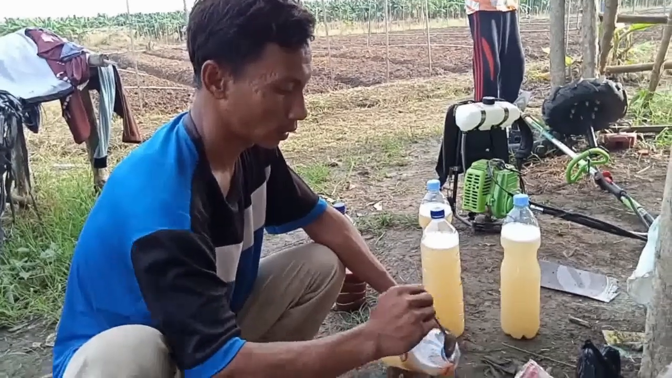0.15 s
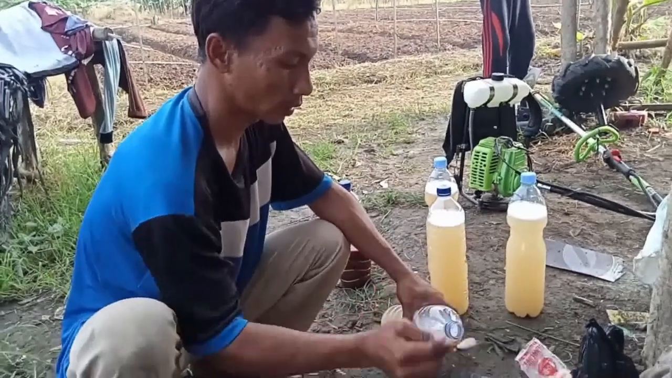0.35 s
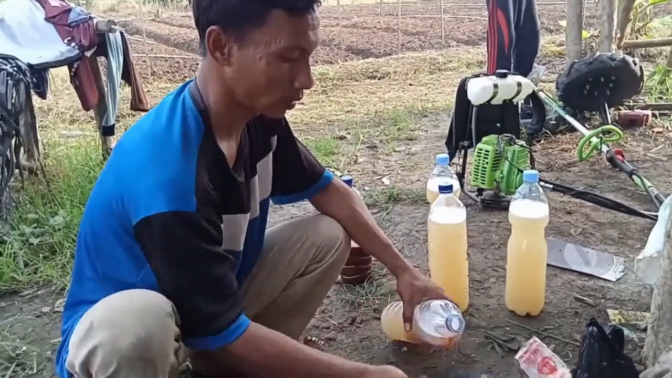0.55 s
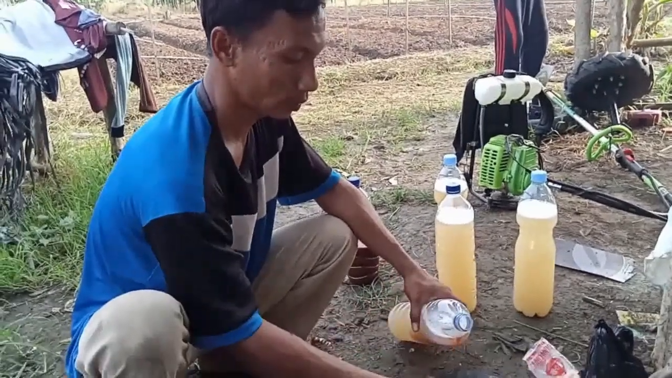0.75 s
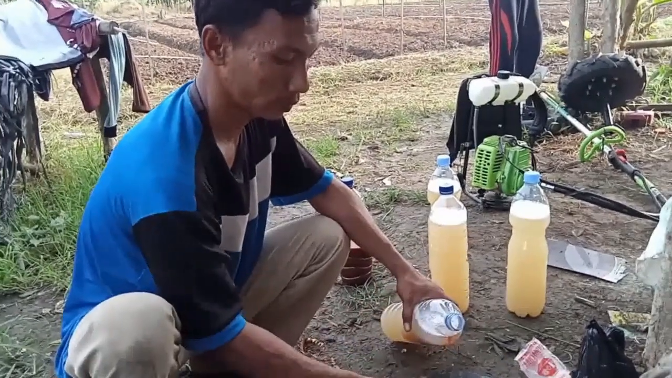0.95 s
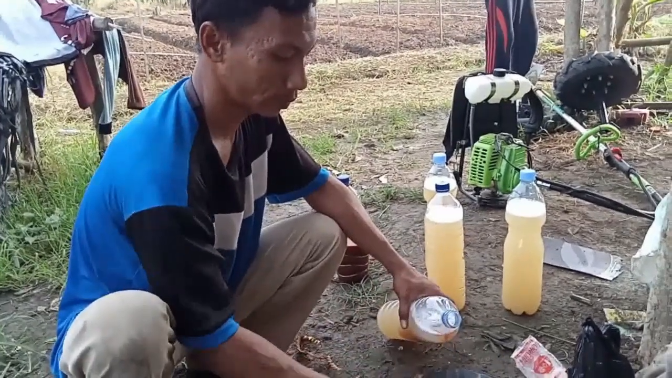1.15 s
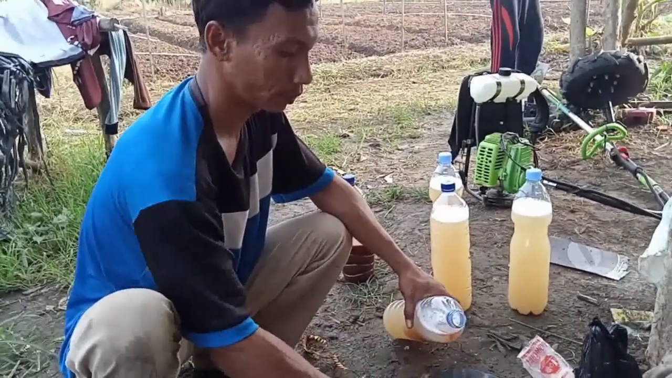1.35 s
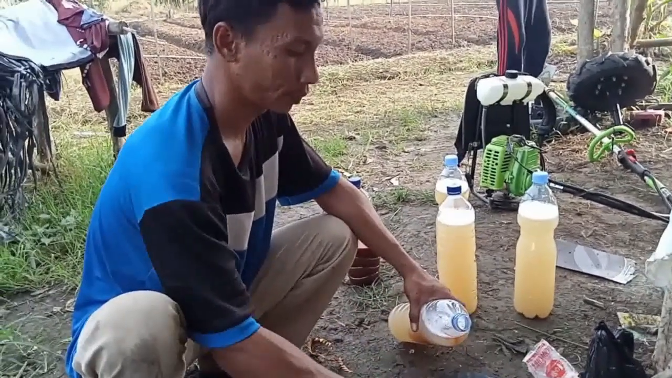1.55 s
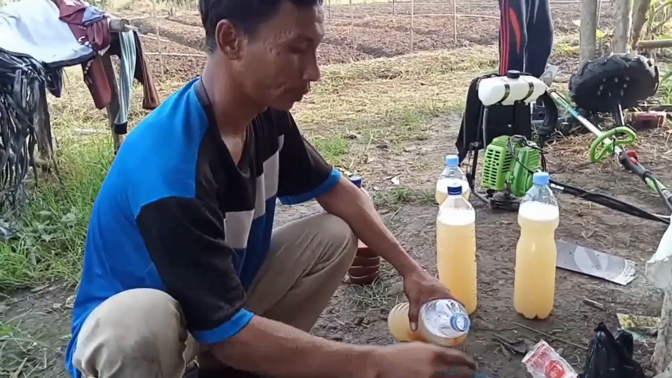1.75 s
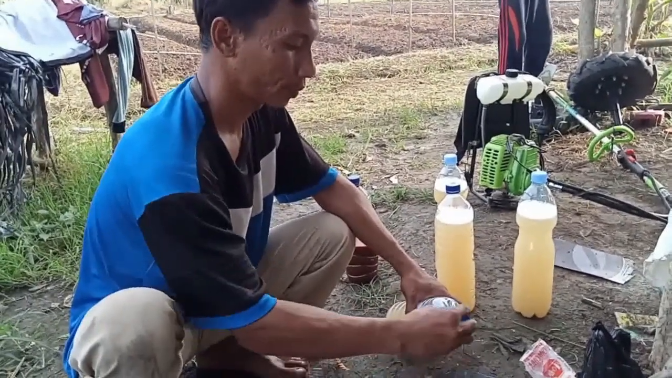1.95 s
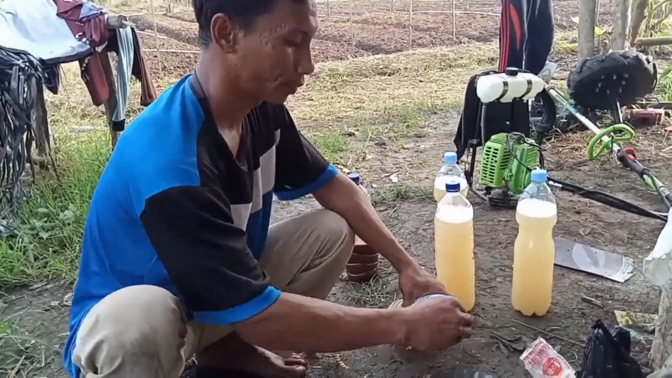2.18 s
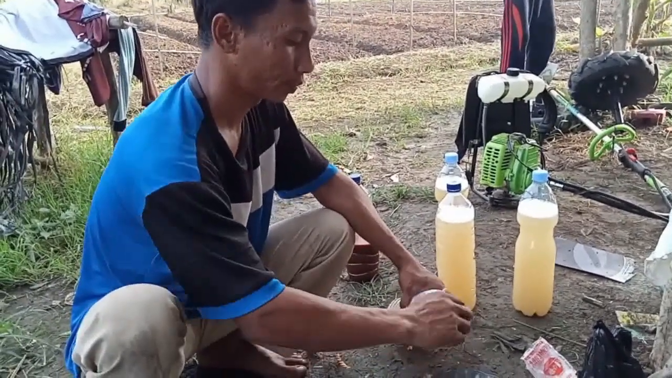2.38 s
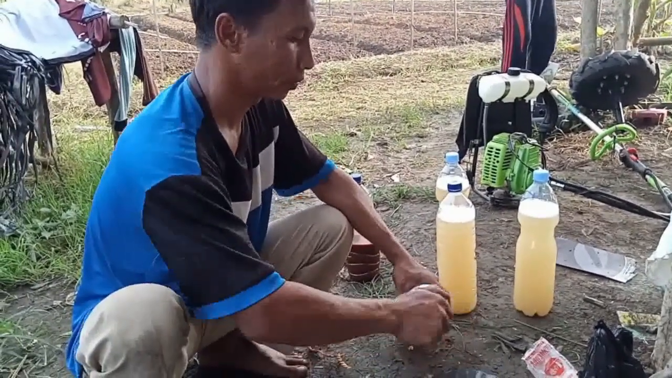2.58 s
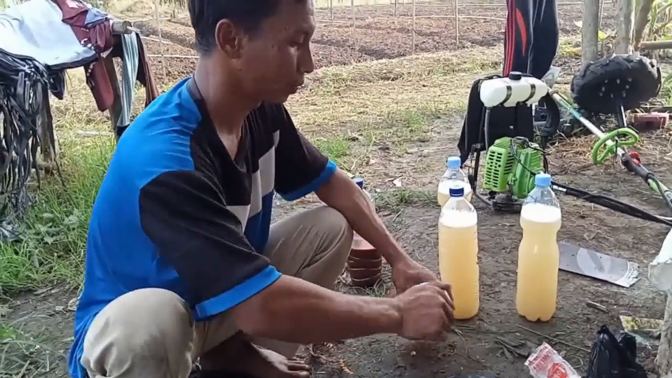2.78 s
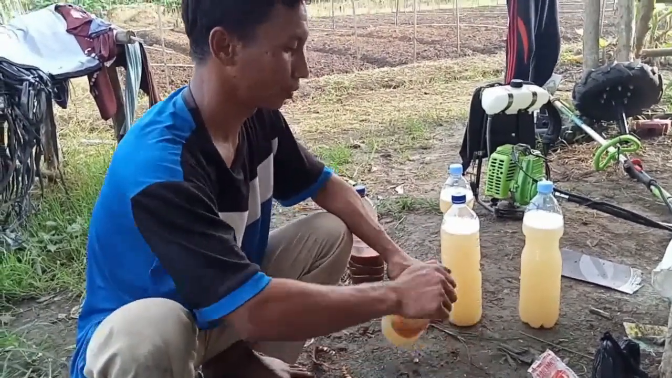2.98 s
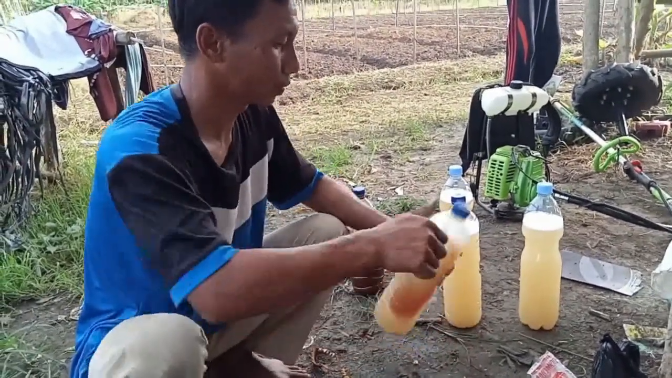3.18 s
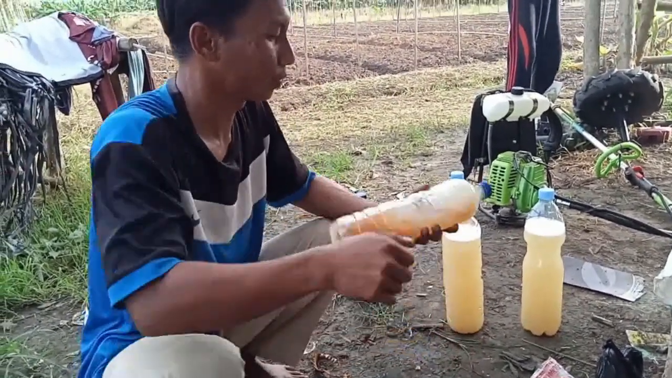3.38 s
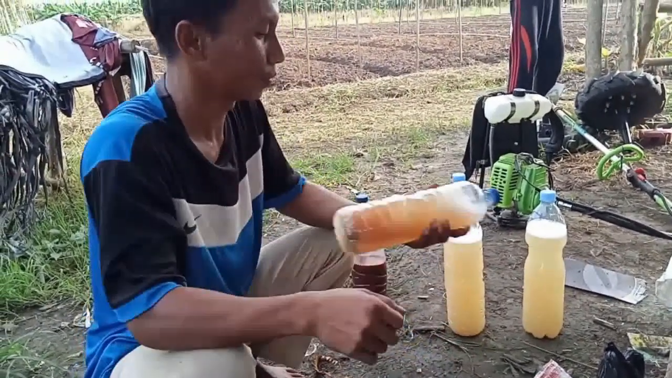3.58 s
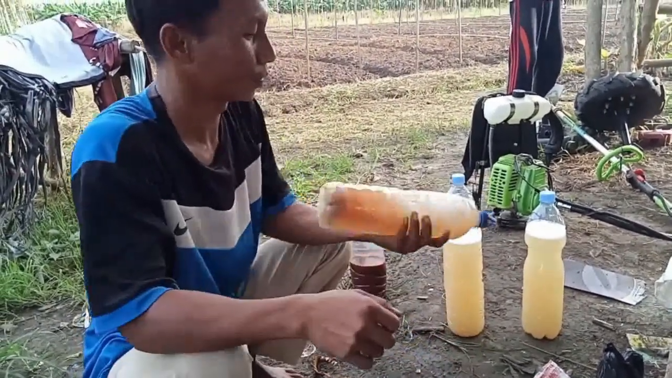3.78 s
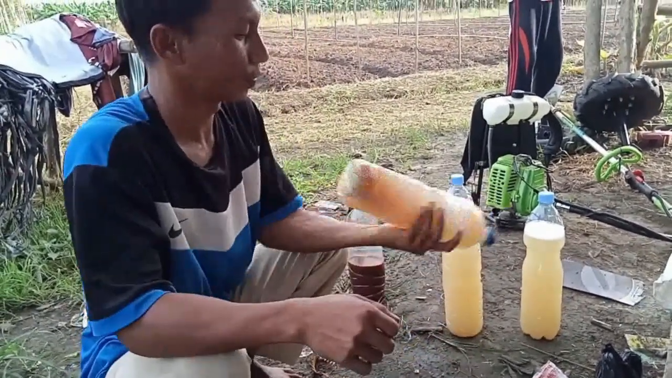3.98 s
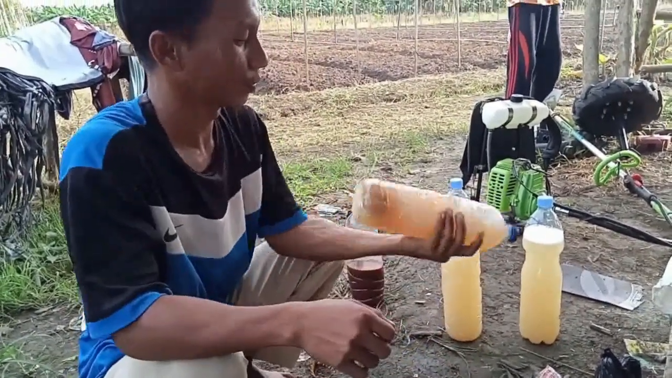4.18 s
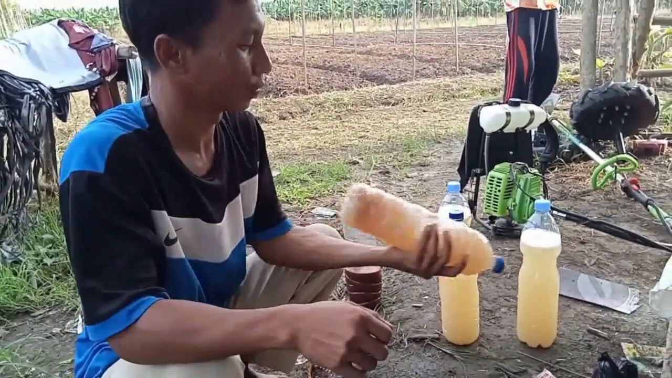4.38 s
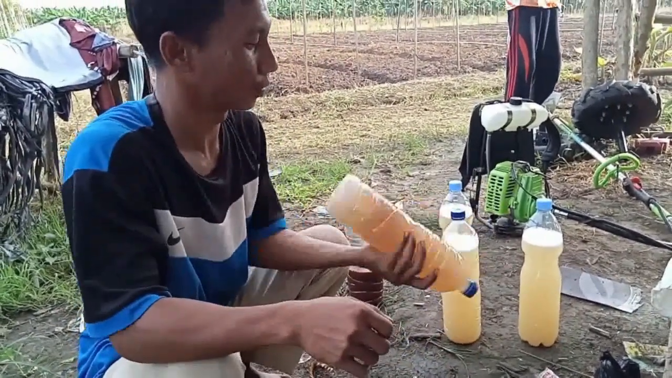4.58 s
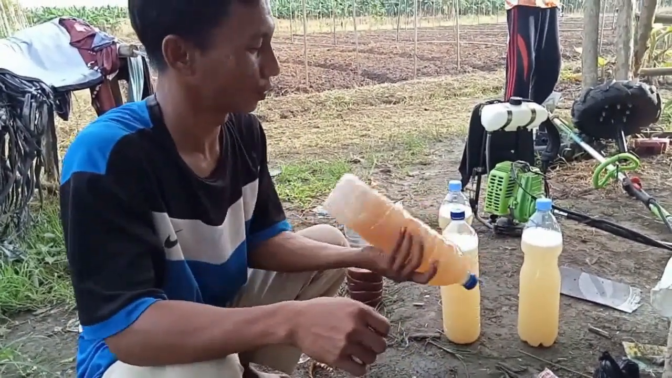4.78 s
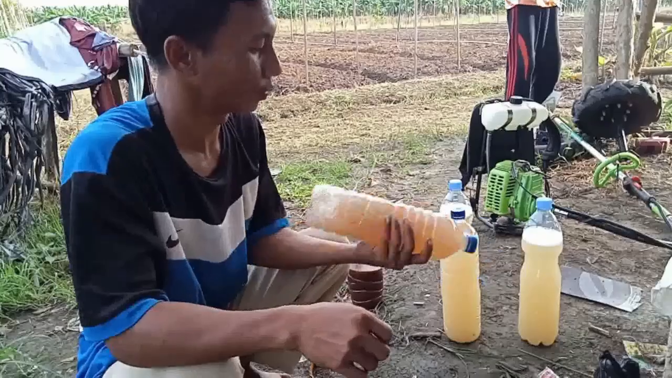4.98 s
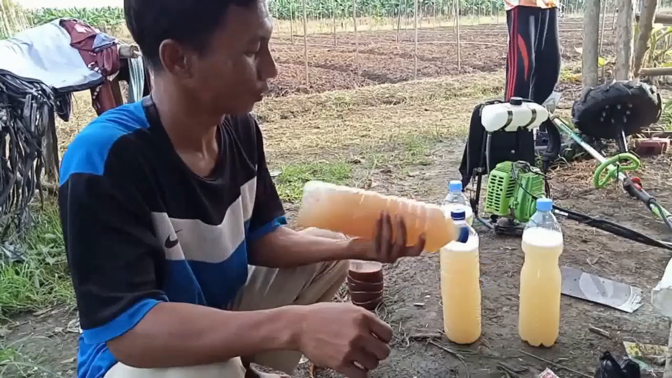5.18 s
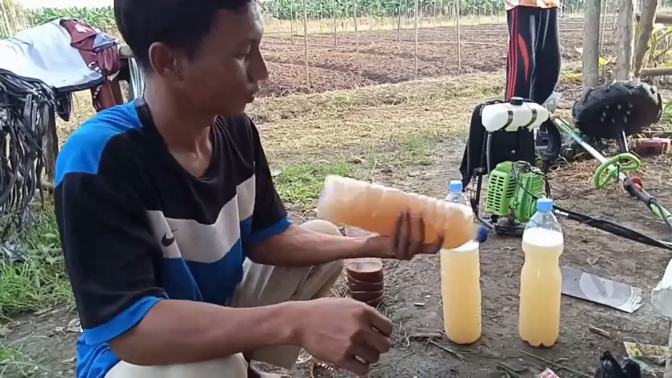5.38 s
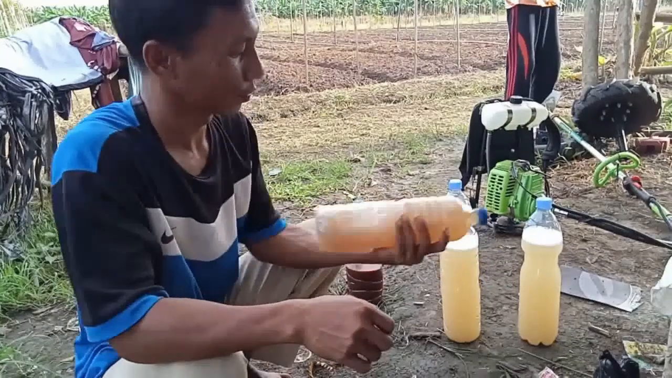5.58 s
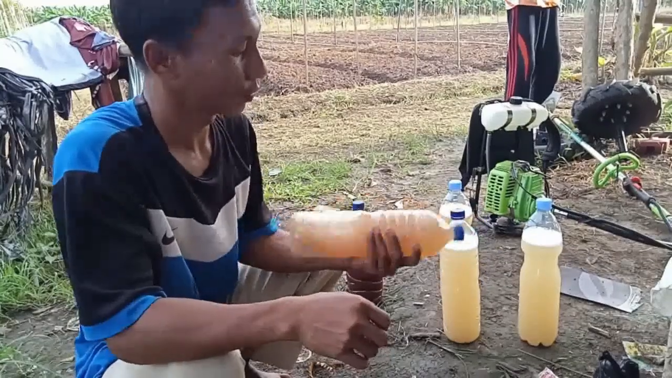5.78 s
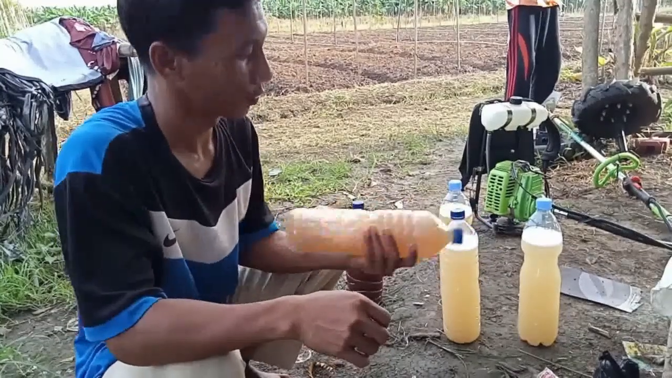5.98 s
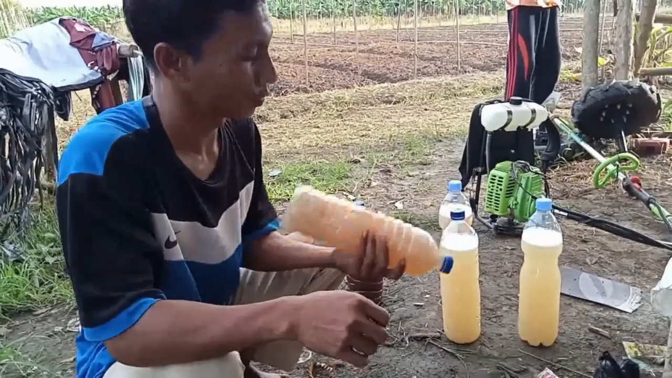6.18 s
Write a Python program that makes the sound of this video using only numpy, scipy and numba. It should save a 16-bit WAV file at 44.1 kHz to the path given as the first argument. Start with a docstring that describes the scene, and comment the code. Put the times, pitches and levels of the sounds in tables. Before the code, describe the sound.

A steel spoon taps a bottle neck twice, then drops and bounces with a bright ring. A hand brushes over dry ground, clicking bits of grit. A plastic bottle cracks loudly as its cap is tightened, then is shaken, the liquid slapping, gulping and fizzing inside. It is heard from a nearby phone in a quiet field with faint insects.

```python
"""A steel spoon taps a bottle neck twice, then drops and bounces, ringing. A hand gropes over dry ground
and clicks grit. The plastic bottle cracks as its cap is tightened, then is shaken hard: slugs of liquid
slap the wall, bubbles gulp and fizz. Behind, a quiet field: insects hiss, a far engine hums and a bird
whistles once. Heard through a nearby phone."""
import sys
import numpy as np
from scipy import signal
from scipy.fft import rfft, irfft
from scipy.io import wavfile
from scipy.ndimage import uniform_filter1d
from numba import njit

SR = 44100
rng = np.random.default_rng(int(sys.argv[2]) if len(sys.argv) > 2 else 0)


def file_out(sig):
    """Save sig as 16-bit WAV at sys.argv[1]."""
    # one column per channel
    cols = np.atleast_2d(sig).T
    # limit, then scale
    lim = np.clip(cols, -1, 1)
    pcm = np.round(lim * 32767).astype(np.int16)
    wavfile.write(sys.argv[1], SR, pcm)


N = 275468

# two taps, then the drop and its bounces:
# (time [s], level [dB], t60 set by the grip [s], tilt [dB/octave], bowl note [dB], handle modes [dB])
SPOON_BLOWS = [(0.3622, -27, 0.24, -6.5, 9.5, -30), (0.435, -45, 0.13, -4.5, 25, 21),
               (.5656, -18, 4.4, 5.5, -20, 7), (.5714, -21.5, 6, -1, 5.5, 2),
               (.5944, -22.5, 3.0, 4, 3, 3.5), (.6214, -31, 3.0, 2, -5, -24),
               (0.6385, -38, 4.6, -2.5, -12, 3.5), (.6504, -31.5, 2.7, 3, -14, -28),
               (0.6741, -34, 3.6, 0.5, -13, -25)]


def undb(db):
    return 10 ** (np.asarray(db) / 20)


def level(x, rms_db):
    return x * undb(rms_db) / np.sqrt(np.mean(x ** 2))


def fade(t, t60_s):
    return np.exp(-np.log(1000) * t / t60_s)


def add(out, at_s, x, peak_db):
    i = int(at_s * SR)
    out[i:i + len(x)] += (x * undb(peak_db) / np.max(np.abs(x)))[:N - i]


def band(x, lo_hz, hi_hz):
    sos = signal.butter(4, [lo_hz, min(hi_hz, .45 * SR)], "bandpass", fs=SR, output="sos")
    return signal.sosfilt(sos, x)


def colour(x, shape, size=4096):
    """Minimum-phase filter with a (frequency [Hz], gain [dB]) shape."""
    hz, db = np.transpose(shape)
    bin_hz = np.arange(size // 2 + 1) * SR / size
    gain_db = np.interp(np.log(bin_hz + 1), np.log(hz), db)
    cepstrum = irfft(np.log(undb(gain_db)))
    cepstrum[1:size // 2] *= 2
    cepstrum[size // 2 + 1:] = 0
    return signal.fftconvolve(x, irfft(np.exp(rfft(cepstrum))))[:len(x)]


@njit
def resonate(x, hz, width_hz):
    """State-variable band-pass with a moving centre."""
    y, band_state, low_state = np.empty(len(x)), 0., 0.
    for i in range(len(x)):
        g, damping = np.tan(np.pi * hz[i] / SR), width_hz / hz[i]
        v = (band_state + g * (x[i] - low_state)) / (1 + g * (g + damping))
        band_state = 2 * v - band_state
        low_state += 2 * g * v
        y[i] = damping * v
    return y


def smooth(x, samples):
    return uniform_filter1d(uniform_filter1d(x, samples), samples)


def walk(rate_hz):
    """Smooth random drift about zero."""
    hold = int(SR / rate_hz)
    steps = np.repeat(rng.standard_normal(N // hold + 1), hold)
    return 0.55 * smooth(steps, hold)[:N]


def swell(at_s, hold_s, rise_s, fall_s):
    """Gain 1 during the hold; 20 dB down one rise before it and one fall after."""
    t = np.arange(N) / SR - at_s
    return undb(-20 * np.maximum(np.maximum(-t / rise_s, (t - hold_s) / fall_s), 0))


@njit
def bubbles(start, hz, cycles, size, glide):
    """Dying sines, 17 dB down after `cycles` periods; pitch rises by the fraction `glide`."""
    out = np.zeros(N + SR)
    for k in range(len(start)):
        n = int(3 * cycles * SR / hz[k])
        decay = np.exp(-2 * hz[k] / (cycles * SR))
        step = 2 * np.pi * hz[k] / SR
        phase, amplitude = 0., size[k]
        for i in range(n):
            phase += step * (1 + glide * i / n)
            amplitude *= decay
            out[start[k] + i] += amplitude * np.sin(phase)
    return out[:N]


def froth(count, lo_hz, hi_hz, cycles, spread_db, glide):
    """Steady stream of random bubbles, rms 1; about one cycle gives dry ticks."""
    when, pitch, strength = rng.random((count, 3)).T
    hz = lo_hz * (hi_hz / lo_hz) ** pitch
    size = hz * undb(spread_db * np.minimum(-np.log(1 - strength), 4))
    return level(bubbles((when * N).astype(np.int64), hz, cycles, size, glide), 0)


def field():
    """Distant hum and leaves, with narrow noise bands for insects and a far engine."""
    # background spectrum: (frequency [Hz], gain [dB])
    spectrum = [(18, -33), (30, -4), (59, -3), (118, -3.5), (204, -6), (259, -6), (345, -11.5), (844, -13),
                (2540, -19), (3770, -23), (6380, -42.5), (8300, -13.5), (9970, -32.5), (11400, -38.5),
                (16000, -71)]
    # insect bands, likewise cricket and engine: (centre [Hz], width [Hz], level [dB])
    insects = [(8270, 63, -74), (12300, 200, -94)]
    cricket, engine = (11100, 30, -93), (112, 14, -73)
    out = level(colour(rng.standard_normal(N), spectrum), -63) * undb(0.09 * walk(3.27))
    for hz, width_hz, db in insects + [cricket, engine]:
        drone = resonate(rng.standard_normal(N), np.full(N, float(hz)), float(width_hz))
        out += level(drone, db) * undb(0.4 * walk(6.5))
    return out


def bird():
    """One far, wavering whistle."""
    length_s, pitch_hz, waver_hz = .11, 3980, 30
    out, t = np.zeros(N), np.arange(int(length_s * SR)) / SR
    tone = np.sin(2 * np.pi * pitch_hz * t + 0.82 * np.sin(2 * np.pi * waver_hz * t))
    add(out, at_s=2.3, x=np.sin(np.pi * t / length_s) * tone, peak_db=-72)
    return out


def brushing():
    """A hand on ground and cloth: dense grains through a moving resonance, dry hiss above."""
    # touches: (time [s], hold [s], level [dB], centre [Hz], rise [s], fall [s])
    touches = [(0.006, 0.058, -66.5, 2000, 0.059, .15), (.55, .005, -66, 2310, 0.15, .02),
               (0.853, .27, -58.5, 2750, 0.2, 0.075), (1.527, 0.011, -51.5, 2600, 0.011, 0.046),
               (1.574, .01, -48.5, 2550, 0.012, 0.028), (1.775, 0.0047, -39.5, 2930, 0.049, 0.037),
               (1.805, 0.014, -53.5, 2870, .03, 0.098), (2.139, .006, -50.5, 3220, 0.044, 0.073),
               (2.366, 0.0092, -65.5, 2680, 0.066, 0.066), (2.802, 0.018, -56.5, 1700, .01, 0.16),
               (2.951, 0.0076, -52.5, 2050, 0.01, 0.078), (3.054, .03, -61, 2700, 0.17, .08)]
    gains = 1e-9 + np.array([undb(db) * swell(at_s, hold_s, rise_s, fall_s)
                             for at_s, hold_s, db, _, rise_s, fall_s in touches])
    centre_hz = np.transpose(touches)[3] @ gains / gains.sum(axis=0)
    grains = froth(count=40000, lo_hz=1450, hi_hz=11600, cycles=0.87, spread_db=4.5, glide=0.)
    body = grains
    for _ in range(3):
        body = resonate(body, centre_hz, width_hz=2600.)
    hiss = band(grains, 7800, 11500)
    return gains.max(axis=0) * (level(body, 0) + level(hiss, -23))


def grit():
    """Grit and twigs under the hand: each a thud, a click and a high tick."""
    # clicks: (time [s], peak [dB], centre [Hz], tick re peak [dB])
    clicks = [(0.83, -44, 1990, -20.5), (0.9034, -38, 3130, -9), (0.9394, -49.5, 3590, 1.5),
              (0.9712, -42.5, 2450, -7), (0.9971, -38.5, 3200, -15), (1.026, -43.5, 2180, -2.5),
              (1.0657, -36.5, 3060, -12), (1.1068, -43, 2820, -6), (1.132, -29.5, 3040, -12.5),
              (1.519, -39.5, 2790, -26), (1.5274, -47, 2850, -25), (1.5709, -39, 2370, -22),
              (1.7149, -44, 2550, -9), (2.0986, -54, 2450, -8)]
    out, t = np.zeros(N), np.arange(SR // 16) / SR
    for at_s, db, centre_hz, tick_db in clicks:
        click, tick, thud = rng.standard_normal((3, len(t)))
        add(out, at_s, band(thud * fade(t, 0.1), 296, 1620), db - 12)
        add(out, at_s, band(click * fade(t, 0.014), centre_hz / 1.42, centre_hz * 1.32), db)
        add(out, at_s, band(tick * fade(t, 0.047), 6700, 10700), db + tick_db)
    return out


def neck():
    """The two taps ring the bottle neck."""
    # neck modes: (frequency [Hz], level [dB], t60 [s])
    modes = [(2160, -12, .05), (2820, -16, 0.072), (2850, -5, 0.059), (3800, -4, 0.052), (3890, -4, 0.025),
             (4270, -4.5, 0.025), (6870, -18, .03), (8900, -8.5, 0.024)]
    out, t = np.zeros(N), np.arange(SR // 10) / SR
    hz, mode_db, t60_s = np.transpose(modes)[:, :, None]
    ring = (undb(mode_db) * np.sin(2 * np.pi * hz * t) * fade(t, t60_s)).sum(axis=0)
    attack = 1 - np.exp(-t / .0004)
    for at_s, db, *_ in SPOON_BLOWS[:2]:
        add(out, at_s, attack * ring, db + 3)
    return out


def spoon():
    """Each blow cracks, rings the steel and stifles the previous ring; once dropped, the spoon buzzes."""
    # spoon modes: (frequency [Hz], level [dB], t60 [s])
    modes = [(538, -25, 0.59), (1136, -24, 0.63), (1857, -25, 2.1), (2320, -4, 0.16), (2686, -15, 4.4),
             (3042, -24, 0.41), (3515, 0, 0.088), (3666, -22, 3.4), (3741, -16, 0.63), (4048, -16, 0.51),
             (4194, -29, 1.5), (4678, -20, 0.5), (5346, -47, 5.0), (5862, -17, 0.2), (6040, -16, 0.2),
             (6568, -55, 5.0), (7235, -18, 0.39), (7623, -26, 1.6), (8694, -29, 1.0), (9012, -32, 3.6),
             (9426, -19, 0.43), (10140, -24, 0.23), (10350, -25, 0.3), (11400, -22, 0.2),
             (12590, -53, 0.69), (13320, -42, 0.42), (14000, -42, 0.15), (14250, -44, 0.15),
             (15300, -46, 0.26)]
    # buzz of steel on grit: (frequency [Hz], gain [dB])
    buzz_shape = [(880, -19.5), (1500, -17), (1960, 9.5), (3250, -36), (3620, -16), (4460, -21),
                  (5880, -22), (11500, -22), (16000, -56)]
    bowl_hz, drop_s, rest_s = 2320, SPOON_BLOWS[2][0], .7
    out, t = np.zeros(N), np.arange(SR // 3) / SR
    hz, mode_db, t60_s = np.transpose(modes)[:, :, None]
    free = np.sin(2 * np.pi * hz * t) * fade(t, t60_s) * (1 - np.exp(-t / 0.0001))
    bowl = np.exp(-((hz / bowl_hz - 1) / .05) ** 2)
    handle = (hz < 2800) & (t60_s > .5)  # clear of the ground: rings on until the spoon rests
    stops_s = [blow[0] for blow in SPOON_BLOWS[1:]] + [rest_s]
    for (at_s, db, grip_t60_s, tilt_db, bowl_db, handle_db), stop_s in zip(SPOON_BLOWS, stops_s):
        shape_db = mode_db + tilt_db * np.log2(hz / 2500) + bowl_db * bowl + handle_db * handle
        weight = undb(shape_db + rng.standard_normal(hz.shape))
        settled = fade(np.maximum(at_s + t - rest_s, 0), .3)
        stifled = fade(np.maximum(at_s + t - stop_s, 0), 0.13)
        ring = (weight * free * np.where(handle, settled, stifled)).sum(axis=0)
        add(out, at_s, ring * fade(t, grip_t60_s), db)
        mid, high = rng.standard_normal((2, len(t)))
        crack = band(mid * fade(t, 0.057), 2000, 4770)
        crack += undb(tilt_db - 7) * band(high * fade(t, 0.058), 6000, 10400)
        add(out, at_s, crack, db + (-7 if at_s < drop_s else 0.5))
    buzz = colour(rng.standard_normal(len(t)), buzz_shape) * fade(t, 0.41)
    add(out, drop_s, buzz * fade(np.maximum(drop_s + t - rest_s, 0), .05), -33)
    return out


def bottle_wall():
    """Cracks and liquid slaps: the plastic rings, a dent snaps through, the liquid booms, a tick on top."""
    # knocks: (time [s], level [dB], centre [Hz], boom re level [dB], tick re level [dB])
    knocks = [(2.605, -30.5, 730, -20, -38), (2.724, -40.5, 1490, -3, -30), (2.758, -3, 965, -33, -43.5),
              (2.791, -31.5, 825, 3, -42), (2.947, -38, 2200, -9.5, -16), (2.979, -39.5, 1890, -9, -30),
              (3.057, -38, 2690, -16.5, -21), (3.145, -15.5, 4230, -42, -20), (3.191, -28, 2800, -34, -17),
              (3.226, -32.5, 1690, -29, -19), (3.266, -29, 1200, -9.5, -24), (3.295, -28, 2280, -28, -17),
              (3.381, -20, 3030, -37, -20), (3.561, -26.5, 724, -24, -19), (3.766, -25.5, 830, -21, -16),
              (3.897, -22.5, 1020, -25.5, -37), (4.03, -40, 790, -14, -27),
              (4.068, -24.5, 3040, -12.5, -12), (4.415, -25, 1880, -30, -18.5),
              (4.493, -29.5, 810, -14, -21), (4.518, -22.5, 3120, -28, -17), (4.613, -32.5, 2640, -10, -13),
              (4.646, -22.5, 2630, -21, -17.5), (4.734, -20.5, 725, -39, -21.5),
              (4.904, -25.5, 1770, -21, -18), (4.981, -22, 785, -15, -17), (5.052, -24, 760, -19, -41),
              (5.131, -19.5, 2480, -30, -19), (5.195, -28, 1560, -14.5, -32), (5.222, -18.5, 774, -25, -25),
              (5.28, -32.5, 800, -20, -1.5), (5.306, -22.5, 1490, -22, -18), (5.374, -14.5, 1760, -34, -13),
              (5.463, -26, 3340, -20, -22), (5.6, -22.5, 2430, -22, -14.5), (5.702, -19.5, 2500, -36, -25),
              (5.795, -20, 1420, -13, -37), (5.828, -20, 714, -16, -37), (6.066, -25.5, 785, -17, -27),
              (6.217, -32.5, 3130, -21, -27)]
    # wall modes: (frequency [Hz], level [dB], t60 before the 30 ms cap [s])
    modes = [(220, -0.5, 0.078), (540, -26, 0.011), (1115, 10.5, 0.049), (1862, -4.5, 0.034),
             (1850, 25, 0.056), (2230, -17, 0.039), (2530, -51, 0.063), (2817, 5.5, 0.11),
             (3160, -23, 0.083), (3512, 16, 0.085), (3634, 17, 0.062), (4680, -6.5, 0.086)]
    # tick spectrum: (frequency [Hz], gain [dB])
    tick_shape = [(4500, -19), (7200, -2.5), (9000, 5.5), (11000, -5.5), (13000, -14), (16000, -27)]
    out, t = np.zeros(N), np.arange(SR // 10) / SR
    hz, mode_db, t60_s = np.transpose(modes)[:, :, None]
    attack = 1 - np.exp(-(t / 0.00093) ** 2)
    decay = fade(t, np.minimum(t60_s, .03))
    for at_s, db, centre_hz, boom_db, tick_db in knocks:
        level_jitter, pitch_jitter = rng.standard_normal((2,) + hz.shape)
        rasp, boom, tick, snap = rng.standard_normal((4, len(t))) * attack
        bent_hz = hz * (1 + 0.049 * pitch_jitter)  # the squeezed wall changes shape
        spot_db = -4 * np.abs(np.log2(hz / centre_hz))  # favours modes near the struck spot's pitch
        weight = undb(mode_db + spot_db + 0.7 * level_jitter)
        ring = (weight * np.sin(2 * np.pi * bent_hz * t) * decay).sum(axis=0)
        rasp = band(rasp * fade(t, 0.055), min(0.5 * centre_hz, 1500), 3920)
        snap = band(snap * fade(t, 0.0071), centre_hz / 1.4, min(1.65 * centre_hz, 4600))
        add(out, at_s, attack * ring / np.max(ring) + undb(-1.5) * rasp, db - 7.5)
        add(out, at_s, snap, db - 7.5)
        add(out, at_s, band(boom * fade(t, .11), 122, 417), db + boom_db)
        add(out, at_s, band(colour(tick * fade(t, .014), tick_shape), 4000, 20000), db + tick_db)
    return out


def gulps():
    """Big bubbles ring and rise in pitch; the churning liquid wobbles their shape."""
    # big bubbles: (time [s], peak [dB], starting pitch [Hz])
    big_bubbles = [(2.792, -23, 663), (3.16, -35.5, 756), (3.411, -34, 794), (3.434, -32, 672),
                   (3.559, -34, 770), (3.607, -29.5, 748), (3.633, -33.5, 717), (3.897, -32, 753),
                   (4.084, -34, 500), (4.494, -29, 798), (4.519, -27.5, 602), (4.652, -34.5, 662),
                   (4.736, -33.5, 698), (4.775, -36, 488), (4.94, -36, 424), (4.98, -38, 554),
                   (5.016, -41, 472), (5.175, -35, 580), (5.194, -32.5, 800), (5.221, -32, 770),
                   (5.356, -31, 770), (5.372, -30, 812), (5.484, -35.5, 664), (5.711, -33, 817),
                   (5.789, -33.5, 527), (5.829, -23, 718), (5.843, -31, 483), (6.063, -31, 748),
                   (6.083, -32, 700)]
    out, t = np.zeros(N), np.arange(SR // 10) / SR
    envelope = (1 - np.exp(-t / 0.00057)) * fade(t, 0.054)
    for at_s, db, hz in big_bubbles:
        gain_wobble, phase_wobble = smooth(rng.standard_normal((2, len(t))), 90) * np.sqrt(135)
        tone = np.sin(2 * np.pi * hz * (t + 1.55 * t ** 2) + 0.23 * phase_wobble)
        add(out, at_s, envelope * (1 + 0.45 * gain_wobble) * tone, db)
    return out


def slosh():
    """Each stroke throws the liquid along the bottle: splash, fizz, gurgle and the surge of its mass."""
    # strokes: (time [s], hold [s], splash [dB], gurgle re splash [dB], surge re splash [dB])
    strokes = [(3.133, 0.063, -45, -13.5, -11), (3.267, 0.015, -46.5, -13, -3),
               (3.344, 0.013, -48.5, -16, -18), (3.382, 0.028, -43, -3, -8.5),
               (3.433, 0.027, -39.5, -13.5, -16), (3.554, 0.15, -44.5, -6, -9.5),
               (3.778, 0.056, -38.5, -5, -11), (3.909, 0.049, -43.5, -5.5, -13),
               (4.026, 0.071, -38.5, -8.5, -8.5), (4.148, 0.041, -48, -2, -15),
               (4.246, 0.048, -41.5, -8, -9.5), (4.377, 0.049, -48, -13.5, -13),
               (4.492, 0.03, -39, -11.5, -9), (4.639, 0.0085, -43.5, -10, -3),
               (4.734, 0.06, -43, -10.5, -4.5), (4.854, 0.052, -45, -6.5, -4.5),
               (4.974, 0.038, -39, -1.5, -9.5), (5.06, 0.053, -46, -11, -6), (5.139, 0.014, -44.5, -7, -9),
               (5.195, 0.039, -39.5, -0.5, -5.5), (5.286, 0.028, -44, -8, -6),
               (5.365, 0.0084, -39, -12.5, -7.5), (5.458, 0.024, -38.5, -5.5, -11),
               (5.541, 0.097, -43.5, -3, -8.5), (5.708, 0.012, -37.5, -6.5, -9.5),
               (5.802, 0.077, -42.5, -4.5, -6.5), (5.94, 0.048, -40, -8.5, -9),
               (6.081, 0.048, -40, -10.5, -13.5), (6.206, 0.011, -51.5, -2.5, -4)]
    # spectra of spray, moving mass and fine bubbles: (frequency [Hz], gain [dB])
    splash_shape = [(530, -31), (900, 2), (1060, -8.5), (1160, 1), (1930, 1), (2140, 1), (3200, 2.5),
                    (4100, -2.5), (6000, -18), (7800, -34), (13200, -120)]
    surge_shape = [(29, -58), (50, 4), (97, 1), (161, 4.5), (269, -2), (308, -34), (420, -6.5), (550, -71),
                   (920, -120)]
    fizz_shape = [(3240, -34), (5500, -7), (6430, -3.5), (7520, -0.5), (8990, 5.5), (11800, -11),
                  (13000, -17), (15200, -30), (16000, -18)]
    times_s, holds_s, splash_db, gurgle_db, surge_db = np.transpose(strokes)

    def envelope(offset_db, fall_s, rise_s=0.023):
        """Strokes add in power."""
        return np.sqrt(sum((undb(db) * swell(at_s, hold_s, rise_s, fall_s)) ** 2
                           for at_s, hold_s, db in zip(times_s, holds_s, splash_db + offset_db)))

    spray = froth(count=9000, lo_hz=875, hi_hz=5750, cycles=11.9, spread_db=2.5, glide=0.33)
    drops = froth(count=2500, lo_hz=1200, hi_hz=12000, cycles=1.3, spread_db=3.5, glide=0.)
    splash = colour(spray + undb(-9) * drops + undb(1.5) * rng.standard_normal(N), splash_shape)
    splash = level(splash, 0) * envelope(0, fall_s=0.085)
    gurgle = froth(count=1100, lo_hz=356.3, hi_hz=922, cycles=7.7, spread_db=2., glide=0.53)
    gurgle *= envelope(gurgle_db, fall_s=0.11)
    heave = froth(count=500, lo_hz=92.7, hi_hz=398, cycles=8., spread_db=4., glide=0.1)
    surge = level(colour(heave, surge_shape), 0) * undb(0.44 * walk(52))
    surge *= envelope(surge_db, fall_s=0.11)
    pops = froth(count=20000, lo_hz=6000, hi_hz=15200, cycles=30., spread_db=5., glide=0.12)
    fizz = colour(pops + undb(2) * drops + undb(6.5) * rng.standard_normal(N), fizz_shape)
    fizz = level(fizz, 0) * envelope(-14, fall_s=.08)
    spurts = undb(2.67 * walk(45) + 2.9 * walk(140))  # the liquid breaks up
    return spurts * (splash + fizz) + gurgle + surge


def scene():
    """Near sources and their scatter off ground, posts and bottles, over the field."""
    near = spoon() + neck() + bottle_wall() + brushing() + grit() + slosh() + gulps()
    t = np.arange(SR // 8) / SR
    scatter = band(rng.standard_normal(len(t)), 163, 3190) * fade(t, 0.13)
    reflections = undb(-34.5) * signal.fftconvolve(near, scatter)[:N]
    return (near + reflections + bird() + field())[None]


def record(dry):
    """The phone drops the deep bass and cuts the top."""
    low_hz, top_hz = 65.3, 15800
    thin = signal.sosfilt(signal.butter(2, low_hz, "highpass", fs=SR, output="sos"), dry)
    return signal.sosfilt(signal.ellip(10, .2, 80, top_hz, fs=SR, output="sos"), thin)


dry = scene()
out = record(dry)
file_out(out)
```